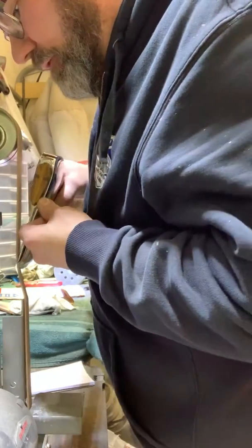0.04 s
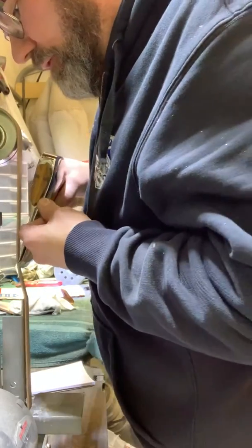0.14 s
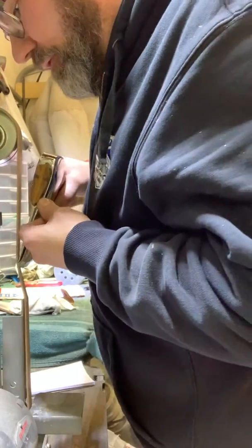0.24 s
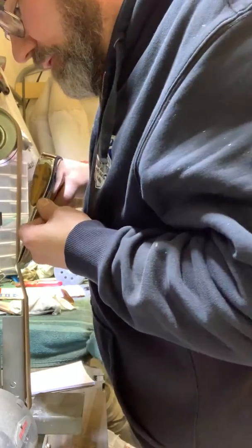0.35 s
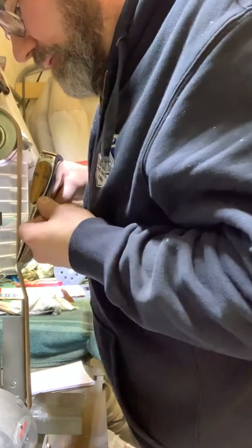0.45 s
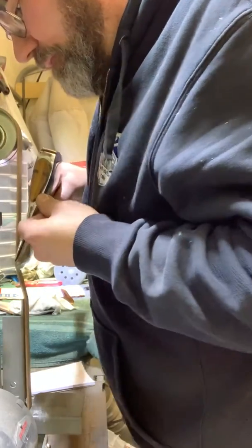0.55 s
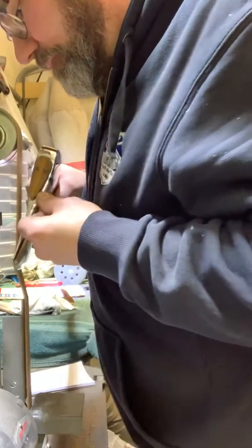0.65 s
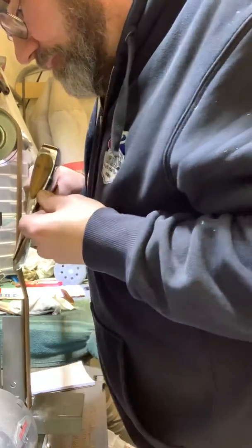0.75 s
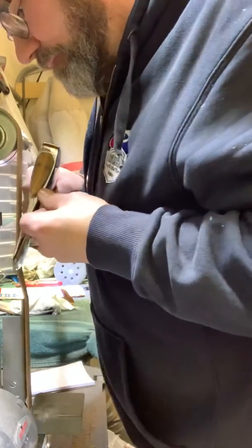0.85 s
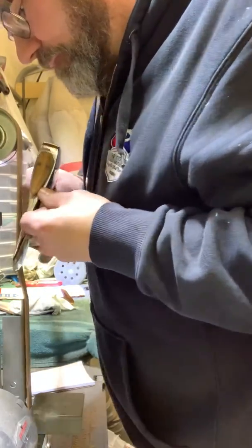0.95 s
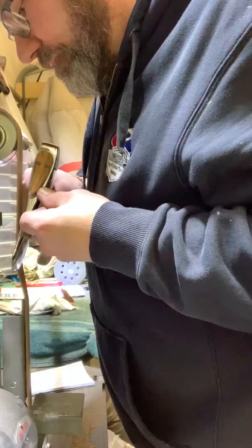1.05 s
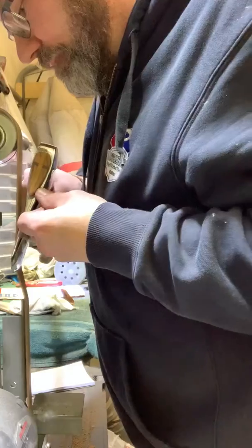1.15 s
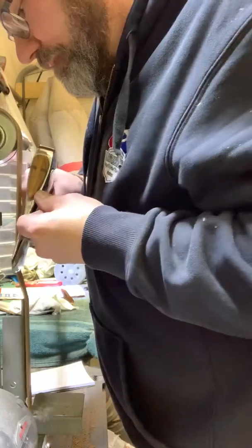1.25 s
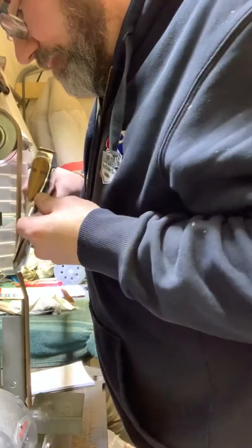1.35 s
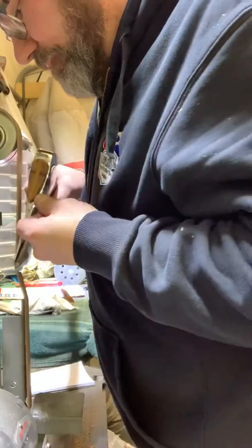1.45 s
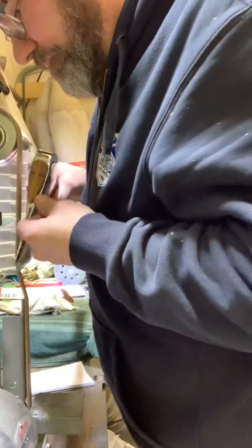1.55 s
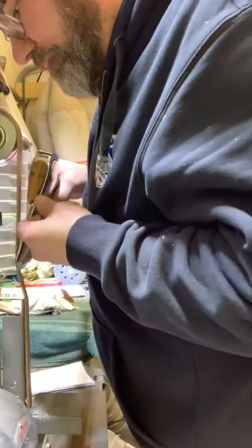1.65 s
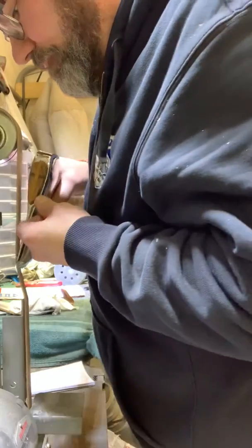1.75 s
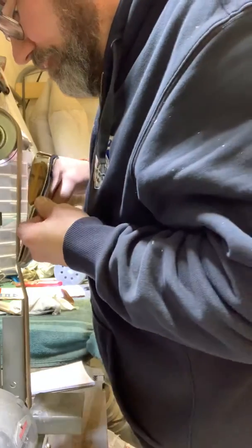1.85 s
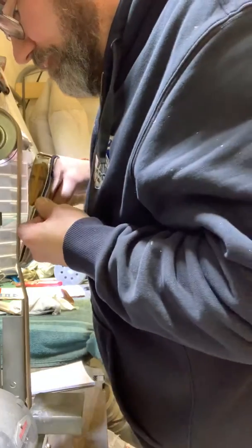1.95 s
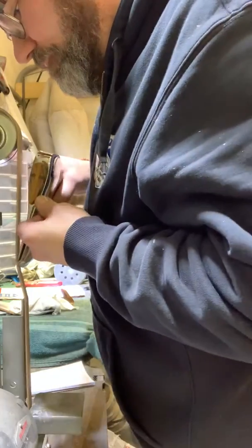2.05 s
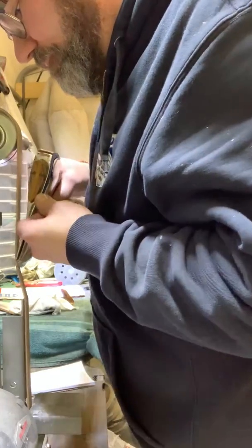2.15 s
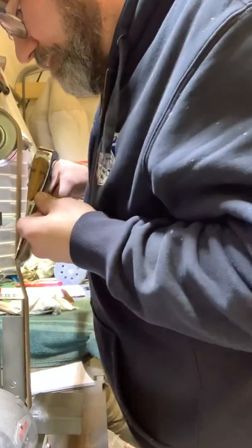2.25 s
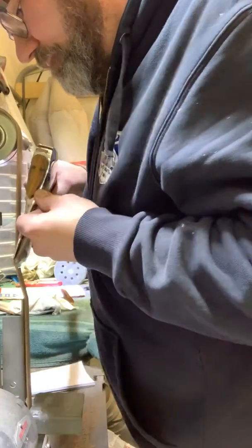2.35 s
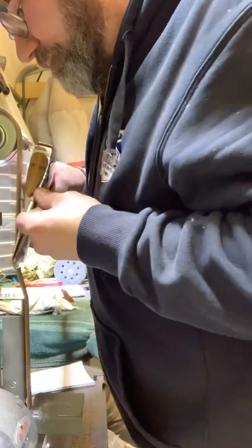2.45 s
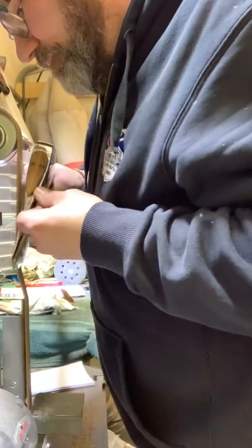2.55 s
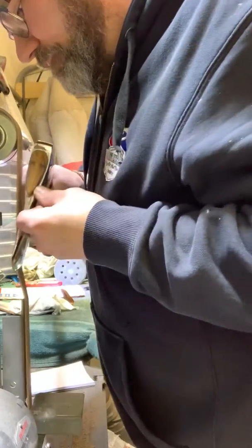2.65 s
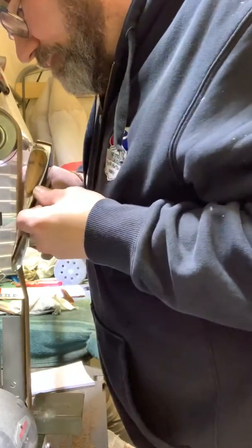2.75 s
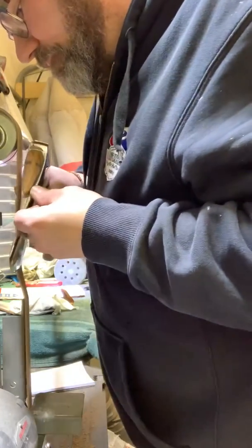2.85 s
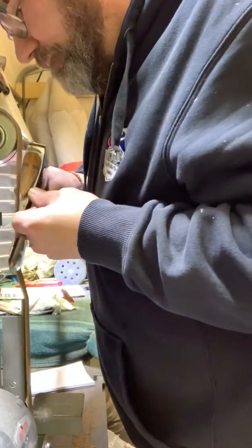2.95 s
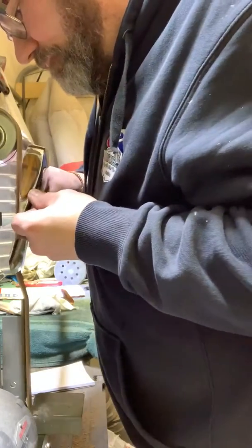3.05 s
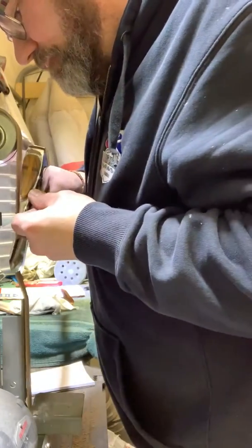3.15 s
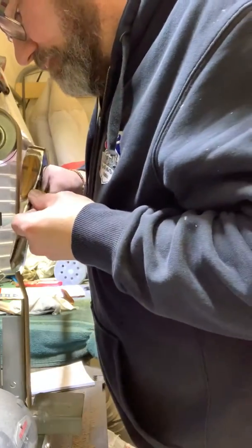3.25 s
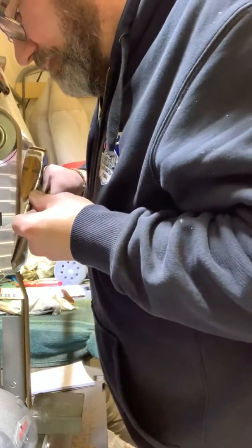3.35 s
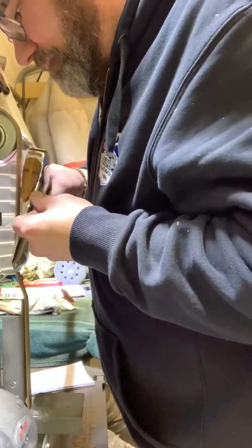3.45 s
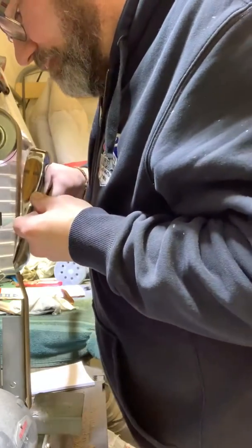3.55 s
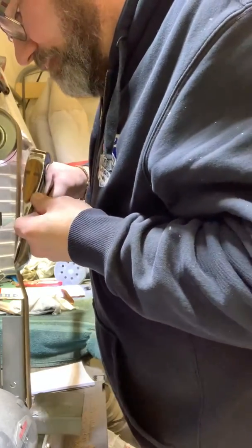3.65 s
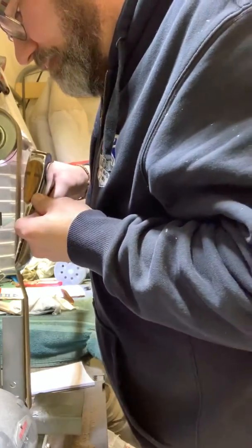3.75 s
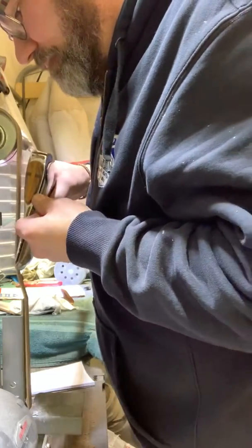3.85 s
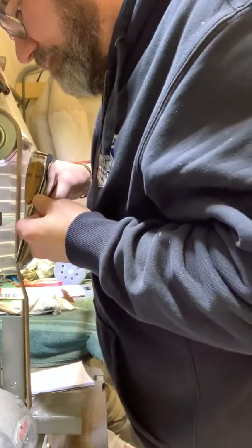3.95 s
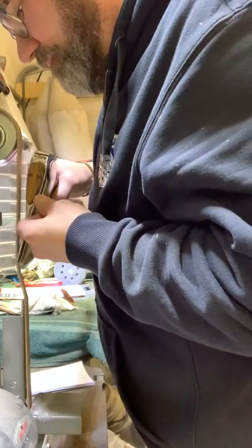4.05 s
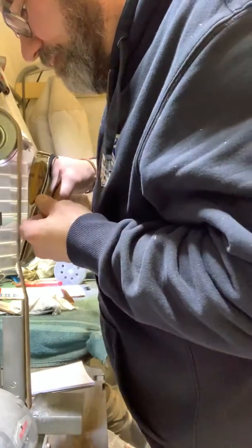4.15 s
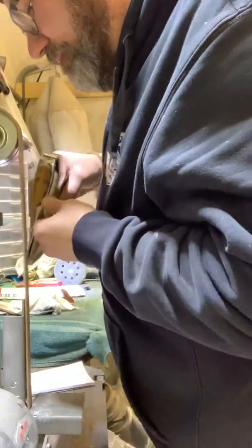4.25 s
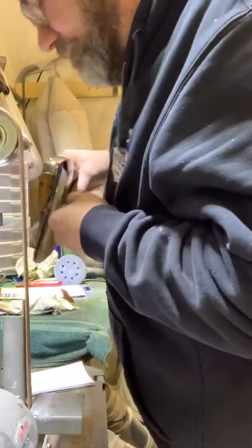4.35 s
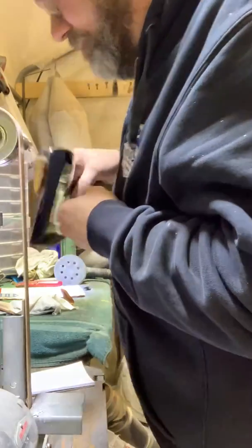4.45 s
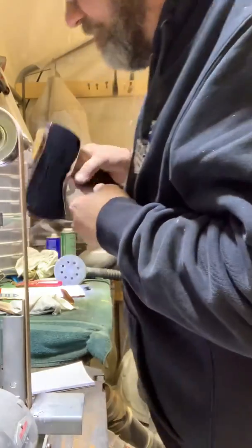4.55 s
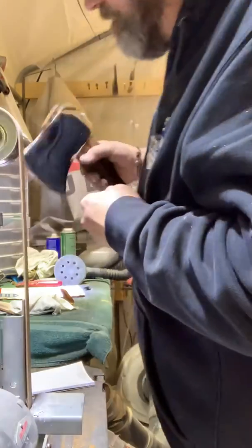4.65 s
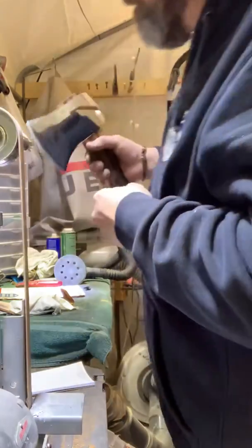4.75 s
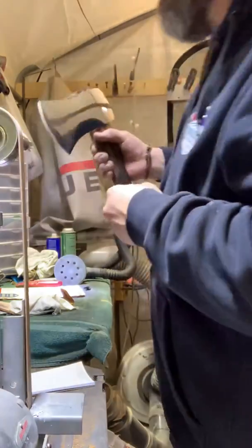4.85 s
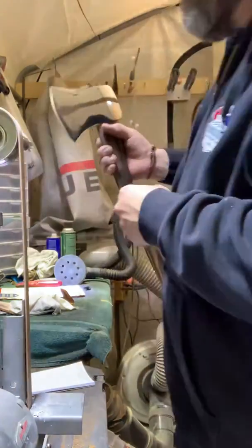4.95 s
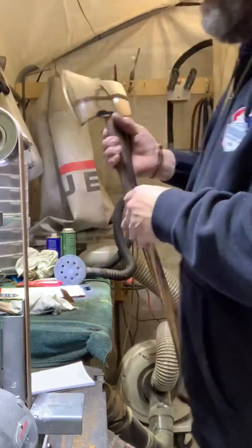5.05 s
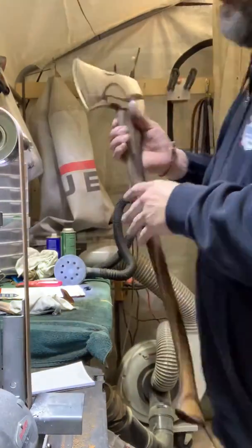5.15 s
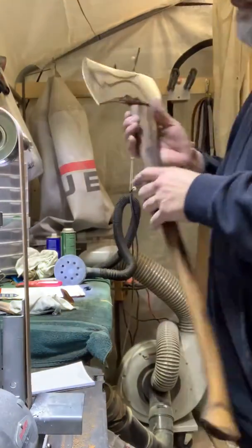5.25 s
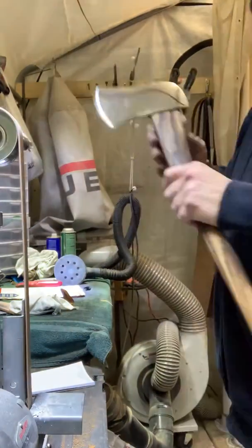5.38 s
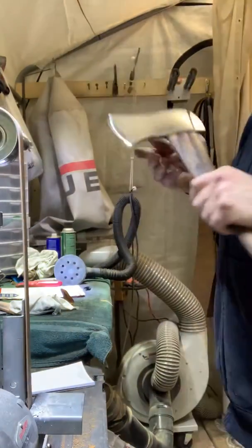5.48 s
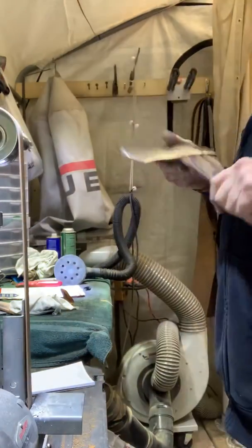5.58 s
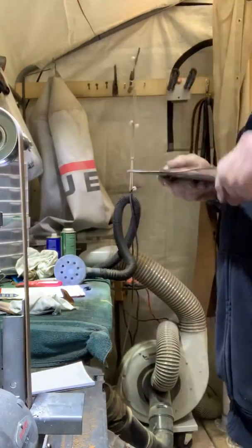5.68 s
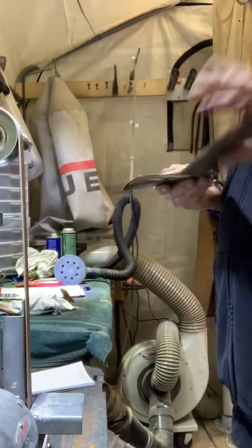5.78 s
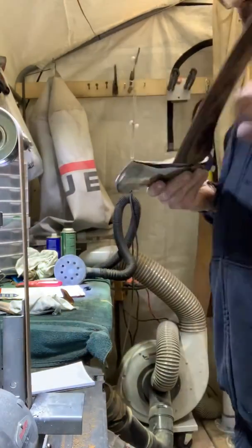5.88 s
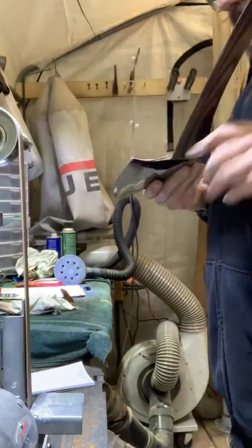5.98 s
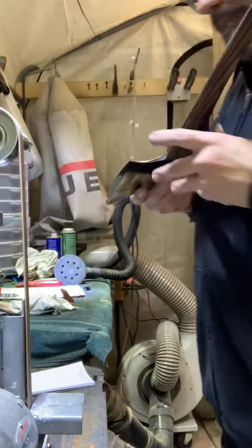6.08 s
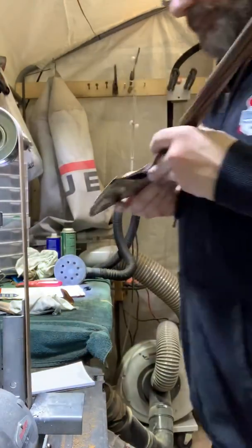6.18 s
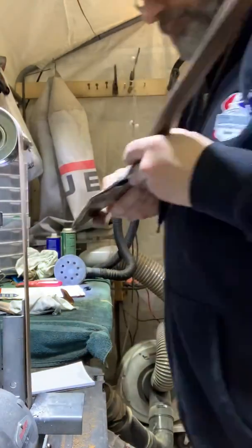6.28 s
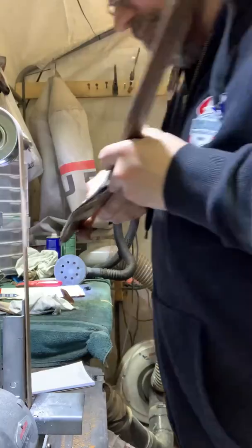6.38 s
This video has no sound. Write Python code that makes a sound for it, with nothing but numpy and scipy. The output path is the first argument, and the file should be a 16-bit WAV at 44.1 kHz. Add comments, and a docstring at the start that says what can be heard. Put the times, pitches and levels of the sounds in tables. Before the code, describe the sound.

A belt sander is already running, heard close in a small workshop with little echo. Its motor hums steadily over a low bench rumble, loose parts clatter, and the frame knocks in slow throbs about twice a second. From the start, an axe edge rubs on the leather belt, making a bright hiss that pulses eight or nine times a second, with thin steel ringing and tiny chirps. A faint, wavering metal note sings twice in the first second. Soft, dull bumps come near 0.8 and 2.7 seconds. The hiss rises and falls with pressure and is strongest from 3 to 4 seconds. At about 4.2 seconds the axe lifts, the hiss quickly dies and the machine gives a brief shudder. It then runs free, humming and swishing more evenly, with a loose part ticking, most sharply from 5 to 6 seconds, until the end at around 6.5 seconds.

```python
"""A small workshop: an axe edge is stropped on the leather belt of a belt sander, then lifted off.
The leather hisses on the steel, swelling with every lap of the belt, and rubs the axe head into ringing.
The induction motor hums and knocks its frame; under load it slips, and the knocking comes in slow throbs.
Loose parts clatter, the belt swishes and the bench rumbles; once the motor runs free, a loose part ticks."""
import sys
import numpy as np
from scipy import signal
from scipy.fft import rfft, irfft, next_fast_len
from scipy.io import wavfile
from scipy.ndimage import map_coordinates

SR = 44100
rng = np.random.default_rng(int(sys.argv[2]) if len(sys.argv) > 2 else 0)


def generate_wav(signal):
    """Clip the signal to [-1, 1] and save it as 16-bit WAV at the path in sys.argv[1]."""
    frames = np.transpose(np.atleast_2d(signal))
    scaled = np.clip(frames, -1, 1) * 32767
    pcm = np.round(scaled).astype(np.int16)
    wavfile.write(sys.argv[1], SR, pcm)


N = 283122
T = np.arange(N) / SR
LAP_HZ, PULL_HZ = 8.634, 119.98  # laps of the belt, magnetic pulls of the motor
LIFT_S, SETTLE_S = 4.18, 0.72  # the edge leaves the belt and the machine settles
SHUDDER_AT_S, SHUDDER_HALF_S = LIFT_S + 0.214, 0.1
HEAVY_AT = .41  # share of a turn at which the shaft's heavy side meets the frame


# Pressure of the edge on the leather, as a fader ride on the hiss: time_s, relative_db
EDGE_PRESSURE = [(0, -30), (.65, -31), (1.12, -33.5), (1.33, -28), (1.8, -31), (2.4, -30.5), (2.8, -33.5),
                 (3.1, -27.5), (3.45, -26.5), (3.75, -27.5), (4.15, -30.5)]
def pressure():
    """The hand bearing down: the ride in dB, and the same ride about its average."""
    press_db, = curves(EDGE_PRESSURE)
    return press_db, press_db - press_db.mean()


# Uneven grip round the belt: lap_share, gain_db
BELT_GRIP = [(.05, 0.7), (.25, -2), (.42, -4), (.57, -1.5), (.67, 0.5), (.87, 1.5)]
# Tone of leather sliding on steel: frequency_hz, relative_db
LEATHER_EQ = [(300, -30), (830, -3), (1000, -11), (1400, -9), (1550, -13), (1750, -10), (2050, -20),
              (2800, -14), (3000, -9.5), (3300, -9.5), (3700, -5.5), (4600, -14), (5500, -11), (6400, -14),
              (7200, -10.5), (7600, -11.5), (7850, -17), (8150, -11.5), (9500, -13.2), (11000, -16),
              (12800, -19.5), (14200, -20), (15400, -14.5)]
def strop():
    """Leather drags on the edge, hissing and exciting the steel; the same patches return every lap."""
    press_db, extra_db = pressure()
    lift_db = -122 * np.maximum(T - LIFT_S, 0)
    lap, lap_samples = T * LAP_HZ % 1, round(SR / LAP_HZ)
    # a hard-pressed edge flattens the leather, which evens out its grip
    grip_db = np.interp(lap, *np.transpose(BELT_GRIP), period=1) * (1 - .07 * extra_db)
    sticky_patches = signal.detrend(wobble(110)[:lap_samples])
    grip_db += .5 * np.resize(sticky_patches, N)
    flicker_db = .6 * wobble(40) + 1.9 * wobble(300)
    hiss = amp(press_db + lift_db - 5 + grip_db + flicker_db) * noise(LEATHER_EQ)
    ring = amp(extra_db + lift_db - 1.5) * head_ring(lap, lap_samples, grip_db)
    chirps = amp(.4 * extra_db + lift_db) * head_chirps(lap, extra_db)
    return placed(hiss + ring + chirps + singing(), lag_ms=.113, left_db=0, wet_db=-13)


# High modes of the axe head: pitch_hz, relative_db, lap_share (the rub peaks 0.15 lap earlier)
HIGH_MODES = [(2230, -58, .6), (2950, -57, .9), (3650, -49, .9), (3757, -50, .88), (3886, -42.5, .88),
              (4150, -51, .9), (4750, -51, .95), (4844, -47, .98), (4931, -48.5, .98), (5630, -51.5, .08),
              (6180, -53, .88), (6869, -52, .82), (7280, -51, .85), (7425, -45, .85), (8290, -52, .82),
              (8408, -46, .82), (9259, -44.3, .72), (10217, -44, .78), (10950, -54, .8)]
def head_ring(lap, lap_samples, grip_db, q=230):
    """Each high mode swells at its own spot of the lap and rings on, damped by the hands."""
    # the leather's grain comes round too, so part of the rubbing repeats
    grain = np.resize(rng.standard_normal(lap_samples), N) + rng.standard_normal(N)
    out = np.zeros(N)
    for hz, db, spot in HIGH_MODES:
        swell_db = 2 * np.cos(2 * np.pi * (lap - spot + 0.15))
        rub = amp(swell_db + 0.82 * grip_db + wobble(12)) * grain
        out += amp(db) * unit(filtered(rub, lambda f: resonance(f, hz, hz / q) * resonance(f, hz, 154)))
    return out


# The two lowest modes of the head: pitch_hz, relative_db
LOW_MODES = [(2443, -50), (2688, -52.5)]
# How far pressure pulls each one flat: sag_hz_per_db
MODE_SAG = [0, 4]
# Chirps on every lap: mode_index, relative_db, lap_share, narrowness, bend_hz
LAP_CHIRPS = [(0, -32.8, .58, 14, 45), (0, -39.5, .04, 12, 40), (0, -43, .38, 22, 20),
              (0, -42.5, .79, 16, 30), (1, -39.5, .82, 3, 18), (1, -45, .2, 14, 10)]
def head_chirps(lap, extra_db):
    """The low modes ring faintly under the leather and give a falling chirp at each sticky spot."""
    out = np.zeros(N)
    for hz, db in LOW_MODES:
        rub = rng.standard_normal(N)
        out += amp(db) * unit(filtered(rub, lambda f: resonance(f, hz, 27) * resonance(f, hz, 62)))
    for mode, db, spot, narrowness, bend_hz in LAP_CHIRPS:
        angle = 2 * np.pi * (lap - spot)
        centre_hz = LOW_MODES[mode][0] - MODE_SAG[mode] * extra_db
        pitch_hz = centre_hz - bend_hz * np.sin(angle) + 5 * wobble(12)
        envelope = np.exp(narrowness * (np.cos(angle) - 1))
        level = amp(db + .7 * wobble(8) + 2.2 * wobble(150))
        out += envelope * level * np.sin(2 * np.pi * np.cumsum(pitch_hz) / SR)
    return out


# Held notes of the steel: start_s, end_s, level_db
HELD_NOTES = [(.2, .54, -45), (.64, 1.0, -44.5)]
def singing(pitch_hz=1577, fade_s=.04):
    """Early in the pass the steel catches and sings a faint, wavering note."""
    level = sum(amp(db) * np.clip(np.minimum(T - start, end - T) / fade_s, 0, 1)
                for start, end, db in HELD_NOTES)
    return level * amp(1.6 * wobble(21)) * np.sin(2 * np.pi * (pitch_hz * T + .13 * wobble(25)))


# Hum partials, each at a sum of two rates: pull_multiple, shaft_multiple, loaded_db, free_db
HUM_PARTIALS = [(0, 2, -47, -51), (0, 2.19, -56, -52), (1, -1, -51, -47), (0, 3.32, -47, -52),
                (1, 0, -33.5, -32.5), (1, 1, -34, -37.5), (1, 2, -47, -49), (2, 2, -47.5, -51.5),
                (3, -1, -47.5, -47.5), (3, 3, -52, -58), (3, 0, -47, -44), (3, 1, -49, -45),
                (4, -1, -54, -51.5), (4, 0, -54, -50.5), (4, 1, -49.5, -55.5), (4, 2, -50.5, -50),
                (5, -1, -54.5, -53.5), (5, 0, -53, -53), (6, -1, -51, -54), (6, 0, -43.5, -44),
                (6, 1, -50, -76), (7, -1, -60, -51.5), (7, 0, -48.5, -61), (9, 0, -52.5, -56),
                (10, 0, -53, -59), (15, -1, -54.5, -61)]
def motor_hum(turns):
    """Magnetic hum, with sidebands from the turning shaft and wheels."""
    out = np.zeros(N)
    for pulls, shaft, loaded_db, free_db in HUM_PARTIALS:
        # the deep hum is phased to dip once a turn, as the heavy side strikes the frame
        offset = rng.random() * (pulls != 1)
        cycles = pulls * PULL_HZ * T + shaft * (turns - HEAVY_AT + .5) + offset + 0.047 * wobble(5.7)
        level = amp(by_load(loaded_db, free_db) + 0.92 * wobble(4.63))
        out += level * np.sqrt(2) * np.sin(2 * np.pi * cycles)
    return placed(out, lag_ms=-.08, left_db=.3, wet_db=-40)


# Throbs as the loaded rotor slips: start_s, end_s, knock_rise_db
SLIP_THROBS = [(-.1, 0.202, 8.5), (0.506, 0.713, 8), (0.854, 1.146, 7.5), (1.32, 1.602, 7.5),
               (1.763, 1.902, 6.5), (1.895, 2.11, 10), (2.265, 2.553, 7), (2.71, 2.997, 8.5),
               (3.075, 3.278, 8), (3.42, 3.66, 7.5), (3.871, 4.185, 9)]
def rattle(turns):
    """Each magnetic pull jolts frame and loose parts, hardest when it meets the shaft's heavy side."""
    throb_db = sum(db * gate(start, end, edge_s=0.03) for start, end, db in SLIP_THROBS)
    pulls = (np.arange(int(T[-1] * PULL_HZ)) * SR / PULL_HZ).astype(int)
    lean = np.cos(2 * np.pi * (turns[pulls] - HEAVY_AT)) - 1
    jolts, taps = np.zeros((2, N))
    jolts[pulls] = amp(by_load(12.5, 13)[pulls] * lean + 0.83 * rng.standard_normal(len(pulls)))
    taps[pulls] = amp(2.8 * lean + 1.3 * rng.standard_normal(len(pulls)))
    knock = frame_knock(jolts, throb_db)
    chatter, wash = clatter(taps, throb_db / throb_db.max())
    frame = placed(knock, lag_ms=0.046, left_db=-0.3, wet_db=-35.5)
    loose_parts = placed(chatter + guard_knock(jolts), lag_ms=-.17, left_db=6.5, wet_db=-10)
    return frame + loose_parts + wash


# Body of the frame: pitch_hz, width_hz, relative_db
FRAME_MODES = [(223, 16.4, -6), (366, 23, -28)]
def frame_knock(jolts, throb_db):
    """The jolted frame knocks, hums a note as each throb lets go, and moans in its shudder."""
    loaded_db = -37 + throb_db + 0.85 * wobble(23.95)
    level_db = by_load(loaded_db, -40.5 + 4 * free_swell()) + shudder_db()
    knock = amp(level_db) * struck(jolts, FRAME_MODES, centre_hz=280, band_hz=75)
    after_notes = sum(note(end + 0.049, hz=335.3, db=-38.5, half_s=0.049) for _, end, _ in SLIP_THROBS)
    moan = note(SHUDDER_AT_S, hz=490, db=-35.5, half_s=SHUDDER_HALF_S / 2)
    return knock + after_notes + moan


# Tone of the loose guards and table: frequency_hz, relative_db
CLATTER_EQ = [(120, -44), (260, -7), (350, -1), (520, 0), (640, -2), (820, -1), (1000, -8.5), (1200, -13),
              (1600, -17.5), (2200, -15.5), (3200, -18.5), (4200, -61)]
def clatter(taps, throb, t60_s=0.026):
    """Loose parts answer each tap with a burst of chatter; a wide wash stands for the room's return."""
    _, extra_db = pressure()
    loaded_db = -37.5 + 4.5 * throb + 0.11 * extra_db
    level_db = by_load(loaded_db, -42.5 + 2 * free_swell()) + 0.19 * shudder_db()
    decay = amp(-60 * T[:SR // 8] / t60_s)
    bursts = signal.fftconvolve(taps, decay)[:N] * rng.standard_normal(N)
    wash = amp(level_db - 3.5) * coloured(rng.standard_normal((2, N)), CLATTER_EQ)
    return amp(level_db) * coloured(bursts, CLATTER_EQ), wash


# Body of the guard: pitch_hz, width_hz, relative_db
GUARD_MODES = [(380, 73, -0.5), (450, 73, -4), (727, 110, -10), (825, 53, -5)]
def guard_knock(jolts):
    """A guard knocks with the jolts through the free-running motor's swell."""
    return amp(-36) * free_swell() * struck(jolts, GUARD_MODES, centre_hz=490, band_hz=500)


# Accents of a loose part: start_s, level_db
SHARP_TICKS = [(5.124, -35), (5.325, -34), (5.425, -34), (5.524, -35.5), (5.558, -36), (5.599, -35),
               (5.691, -34), (5.757, -34.5), (5.825, -36), (5.958, -37)]
# Tone of a tick: frequency_hz, relative_db
TICK_EQ = [(220, -20), (350, 3), (600, 3), (950, 2), (1500, 2), (2200, -4), (3400, -3), (4300, -14),
           (6000, -20), (12000, -28)]
def ticks(turns, speed_hz, t60_s=.055, strike_at=.19):
    """A loose part ticks against the arm once a turn as the motor runs free, at times more sharply."""
    turn, share = np.divmod(turns + 1 - strike_at, 1)
    age_s = share / speed_hz
    scatter_db = 2.2 * rng.standard_normal(int(turn[-1]) + 1)[turn.astype(int)]
    light = by_load(0, 1) * amp(-41 + 2 * free_swell() + scatter_db - 60 * age_s / t60_s)
    sharp = sum(amp(db - 60 * np.abs(T - s) / t60_s) * (T >= s) for s, db in SHARP_TICKS)
    clicks = np.maximum(light, sharp) * noise(TICK_EQ)
    return placed(wheels(clicks), lag_ms=0.12, left_db=-2, wet_db=-7.5)


# Tone of the belt running over its wheels: frequency_hz, relative_db
SWISH_EQ = [(300, -14), (1000, -2), (1300, 1), (1600, -1), (2100, -5.5), (2800, -5), (3300, -3), (3700, -6),
            (4500, -8), (6000, -11), (10000, -16), (13000, -20), (15500, -23)]
def belt(turns):
    """The belt swishes through its wheels, fluttering with the shaft and the motor's pull."""
    shaft_db = 1.2 * np.cos(2 * np.pi * (turns - HEAVY_AT))
    pull_db = 1.3 * np.cos(2 * np.pi * PULL_HZ * T)
    swish = amp(-43 + shaft_db + pull_db + 0.97 * wobble(25)) * noise(SWISH_EQ)
    return placed(wheels(swish), lag_ms=.113, left_db=0, wet_db=-8)


# Ring of the wheels and arm: pitch_hz, width_hz, boost_db
WHEEL_MODES = [(2470, 35, 10), (3220, 35, 7), (3480, 45, 7), (3900, 70, 10), (4850, 50, 12), (7420, 70, 7)]
def wheels(x):
    """The wheels and arm add narrow ringing peaks to x."""
    return filtered(x, lambda f: 1 + sum((amp(db) - 1) * resonance(f, hz, w) for hz, w, db in WHEEL_MODES))


# Low end of the bench: frequency_hz, relative_db
BENCH_EQ = [(20, -3), (35, 0), (52, 21), (75, 17), (105, 22), (170, 17.5), (300, 22.5), (600, -64)]
# Dull bumps: time_s, relative_db
BENCH_BUMPS = [(0.779, -21), (1.03, -40), (2.73, -22), (3.18, -37), (4.54, -26), (6.31, -30)]
def bench():
    """The bench rumbles underneath, a little louder under load, with a few soft bumps."""
    rumble = amp(by_load(-40, -42.5) + 0.48 * shudder_db()) * noise(BENCH_EQ)
    return rumble + sum(note(s, hz=57, db=db - 9, half_s=0.029) for s, db in BENCH_BUMPS)


# Reverb of the workshop: frequency_hz, t60_s
ROOM_DECAY = [(200, 0.15), (2000, 0.26), (12000, 0.0039)]
def placed(x, lag_ms, left_db, wet_db):
    """x in stereo, the left side lag_ms later and left_db louder; the cloth-hung room answers dully."""
    direct = filtered(x, lambda hz: np.exp(np.pi * 1j * hz * lag_ms * np.array([[-1], [1]]) / 1000))
    hz, t, bands = signal.stft(rng.standard_normal((2, SR // 3)), SR, nperseg=256)
    decay = amp(-60 * t / along(ROOM_DECAY, hz)[:, None])
    tail = signal.istft(bands * decay, SR, nperseg=256)[1]
    echo = signal.fftconvolve(x[None], tail / np.linalg.norm(tail[0]), axes=1)[:, :N]
    echo = filtered(echo, lambda hz: amp(along([(2800, -1), (4000, -41)], hz)))
    return (direct + amp(wet_db) * echo) * amp([[left_db / 2], [-left_db / 2]])


def by_load(loaded, free):
    """Crossfade from the loaded value to the free-running one after the lift."""
    return free + (loaded - free) * np.clip(1 - (T - LIFT_S) / SETTLE_S, 0, 1)


def shudder_db():
    """Brief rise of the shaking as the belt springs back."""
    return 5.5 * np.exp(-((T - SHUDDER_AT_S) / SHUDDER_HALF_S) ** 2)


def free_swell():
    """Running free, the rotor slips very slowly: one long swell, from 0 to nearly 1."""
    return gate(5.29, 5.86, edge_s=0.17)


def gate(start_s, end_s, edge_s):
    """A soft-edged window."""
    return .5 * (np.tanh((T - start_s) / edge_s) - np.tanh((T - end_s) / edge_s))


def note(s, hz, db, half_s):
    """A soft tone that swells and fades around time s."""
    return amp(db) * np.exp(-((T - s) / half_s) ** 2) * np.sin(2 * np.pi * hz * (T - s))


def struck(jolts, modes, centre_hz, band_hz):
    """Jolts through a band-pass and modes of alternating polarity, at rms 1."""
    def body(f):
        return sum((-1) ** k * amp(db) * resonance(f, hz, w) for k, (hz, w, db) in enumerate(modes))
    return unit(filtered(jolts, lambda f: resonance(f, centre_hz, band_hz) * body(f)))


def resonance(f, hz, width):
    """Response of one damped mode."""
    return 1j * f * width / (hz * hz - f * f + 1j * f * width)


def noise(eq):
    """Noise with the tone of an EQ curve, at rms 1."""
    return coloured(rng.standard_normal(N), eq)


def coloured(x, eq):
    """x through an EQ curve, at rms 1."""
    return unit(filtered(x, lambda hz: amp(along(eq, hz))))


def filtered(x, response):
    """x through a complex frequency response."""
    size = next_fast_len(N + SR // 4)
    return irfft(rfft(x, size) * response(np.fft.rfftfreq(size, 1 / SR)), size)[..., :N]


def wobble(rate):
    """A smooth random curve, rate knots a second."""
    return map_coordinates(rng.standard_normal(int(N * rate / SR) + 4), [T * rate])


def curves(rows):
    """One value per sample for each column after the time."""
    times, *columns = np.transpose(rows)
    return [np.interp(T, times, column) for column in columns]


def along(points, hz):
    """(Hz, value) points read on a log axis."""
    freqs, values = np.transpose(points)
    return np.interp(np.log(hz + 1), np.log(freqs + 1), values)


def amp(db):
    """Decibels to gain."""
    return 10 ** (np.asarray(db) / 20)


def unit(x):
    """Scale to rms 1."""
    return x / np.sqrt(np.mean(x ** 2) + 1e-20)


# Motor speed, sagging under load: time_s, speed_hz
SHAFT_SPEED = [(0, 29.53), (.4, 29.52), (.75, 29.32), (1.3, 29.48), (2.4, 29.47), (3.15, 29.21),
               (3.9, 29.47), (4.3, 29.883)]
def scene():
    """The axe on the leather, over a machine whose hum, rattle, swish and ticks follow one shaft."""
    speed_hz, = curves(SHAFT_SPEED)
    turns = np.cumsum(speed_hz) / SR
    machine = motor_hum(turns) + bench() + rattle(turns) + belt(turns) + ticks(turns, speed_hz)
    return strop() + machine


def record(dry):
    """A brick-wall high cut at 15.8 kHz."""
    return filtered(dry, lambda hz: hz < 15800)


dry = scene()
out = record(dry)
generate_wav(out)
```